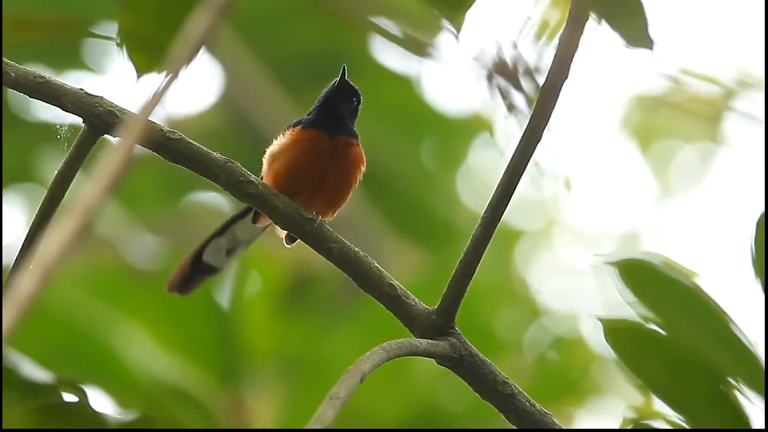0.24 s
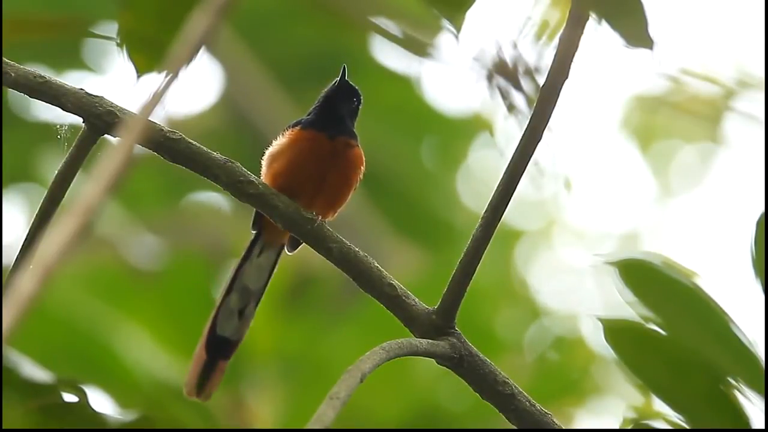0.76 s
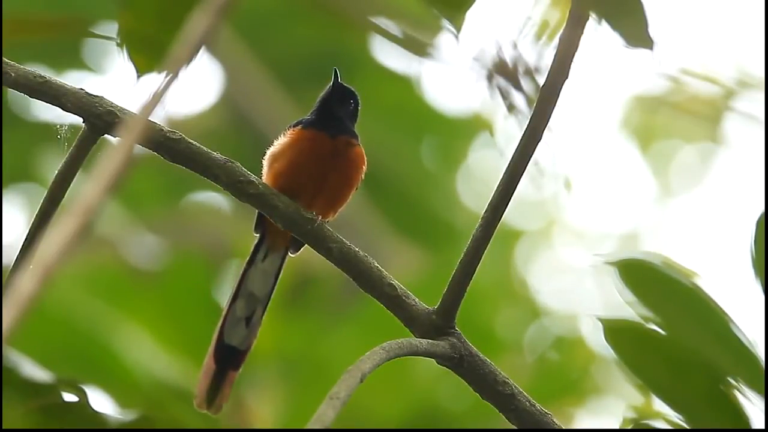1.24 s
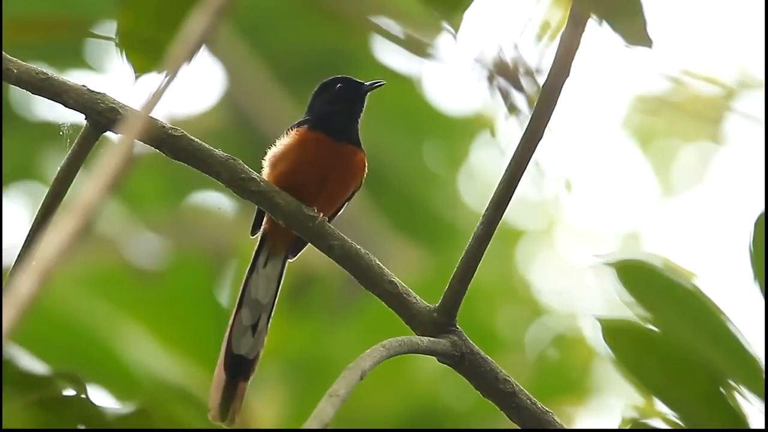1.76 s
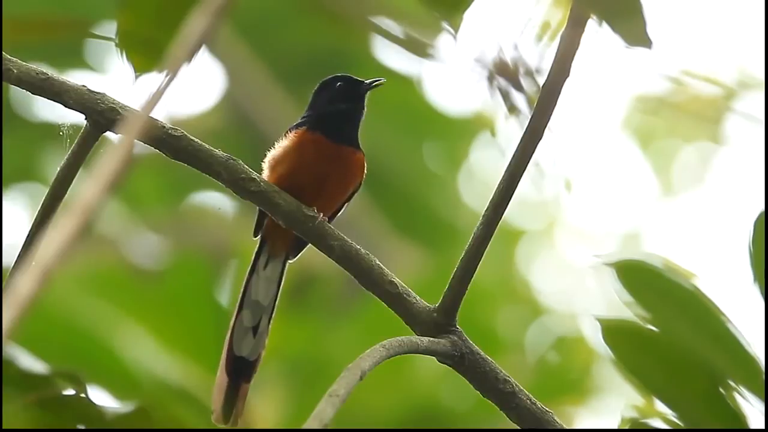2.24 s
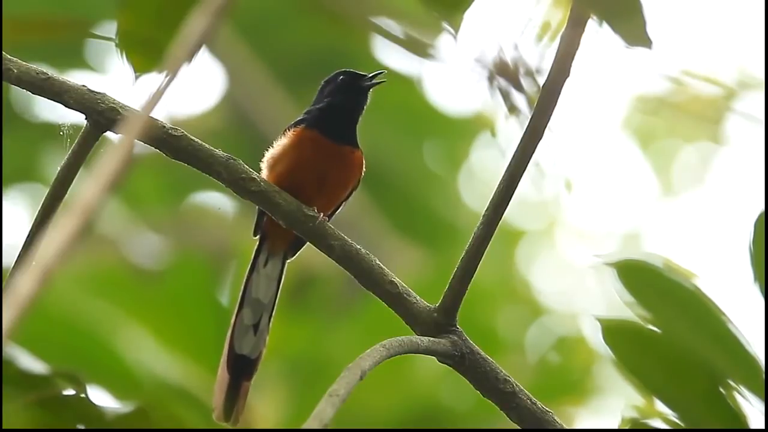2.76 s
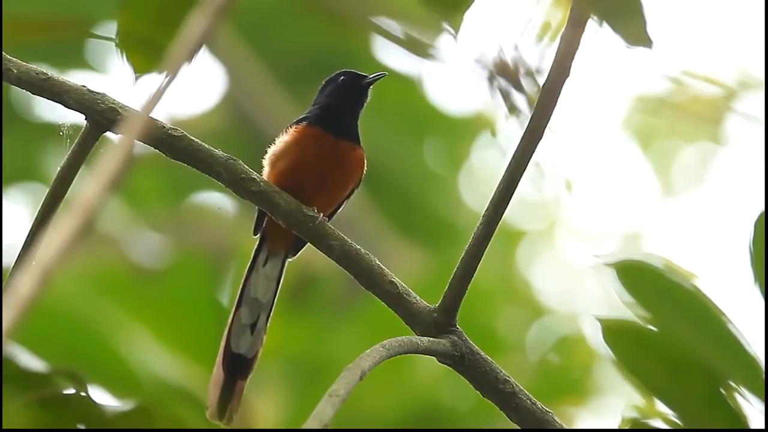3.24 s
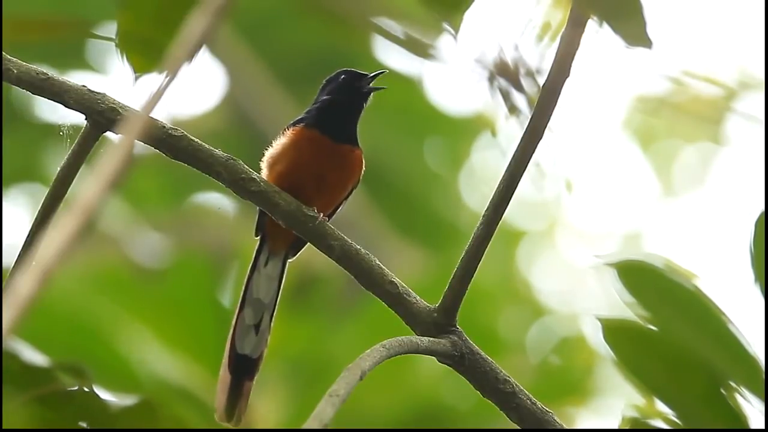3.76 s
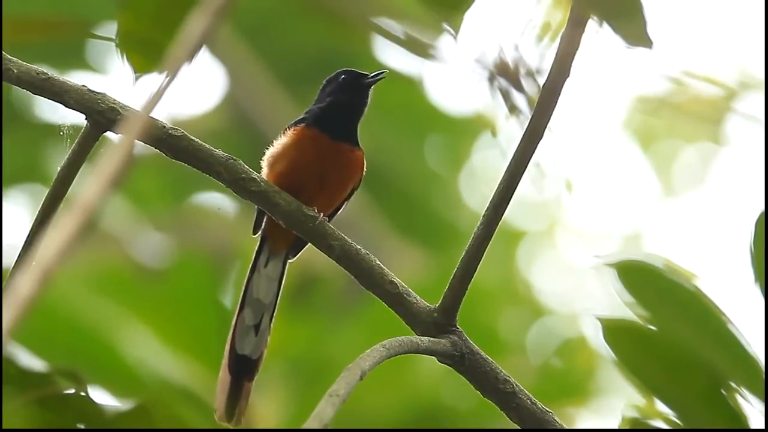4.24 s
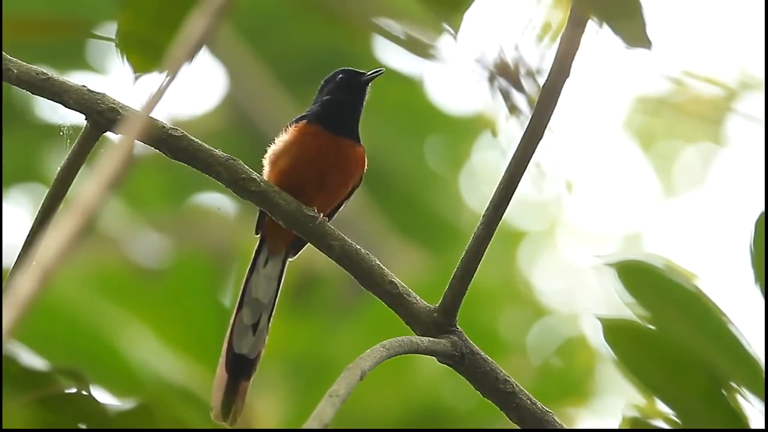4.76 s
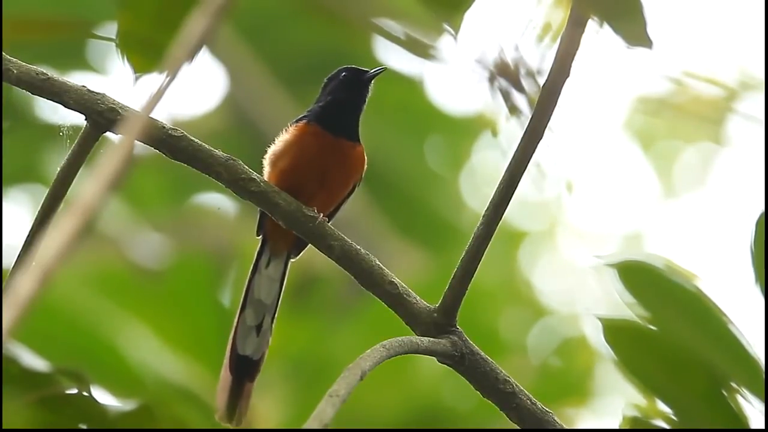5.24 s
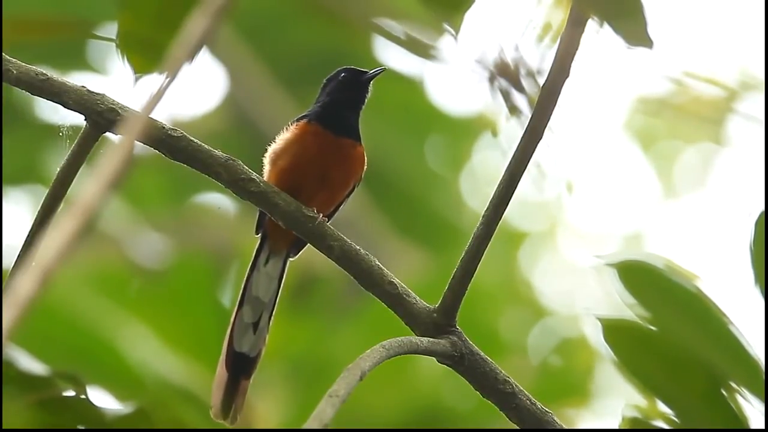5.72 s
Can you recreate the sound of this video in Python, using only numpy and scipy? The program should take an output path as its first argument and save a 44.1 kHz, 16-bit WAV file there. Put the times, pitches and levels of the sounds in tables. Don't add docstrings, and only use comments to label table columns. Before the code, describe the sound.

For the first second there is only soft rumble, a tight high chip and weak far notes. After a tiny dropout, a bird sings loudly: smooth upward whistles around two kilohertz, interleaved with rough, rapidly pulsed churrs climbing a little higher. Small flecks and grace notes decorate them. Close woodland echoes and a leafy tail blur the notes, over steady distant traffic, scraping insects and faint high hiss, in an outdoor pickup.

```python
import sys
import numpy as np
from scipy import signal
from scipy.io import wavfile
from scipy.ndimage import uniform_filter1d

SR = 44100
rng = np.random.default_rng(int(sys.argv[2]) if len(sys.argv) > 2 else 0)


def nominal_scale(level):
    x = np.asarray(level, float) / 20
    return 10 ** x


def dump(signal):
    limited = np.clip(np.atleast_2d(signal).T, -1, 1)
    pcm = np.round(limited * 32767).astype(np.int16)
    wavfile.write(sys.argv[1], SR, pcm)


N = 264159
GAP_START_S, GAP_END_S = 1.2915, 1.3165


def evened(x):
    return x / np.sqrt(np.mean(x ** 2) + 1e-20)


def read(points, hz):
    f, value = np.transpose(points)
    return np.interp(np.log(hz + 1), np.log(f + 1), value)


def curve(rows):
    s, value = np.transpose(rows)
    return np.interp(np.arange(N) / SR, s, value)


def wander(length, hz):
    size = max(int(SR / hz / 2), 2)
    smooth = uniform_filter1d(rng.standard_normal(length), size)
    return evened(uniform_filter1d(smooth, size))


def patchwork(x, size):
    return evened(uniform_filter1d(uniform_filter1d(x, size=size, axis=0), size=size, axis=1))


def hiss(points, patchy_db):
    frames, hz = N // 256 + 5, np.fft.rfftfreq(1024, 1 / SR)
    a, b, patches = rng.standard_normal((frames, 513, 3)).T
    level_db = read(points, hz)[:, None] + patchy_db * patchwork(patches, 12)
    z = (a + 1j * b) * nominal_scale(level_db)
    return evened(signal.istft(z, nperseg=1024, noverlap=768)[1][:N])


def waver(hz, share):
    phase = 2 * np.pi * np.cumsum(hz * (1 + share * wander(N, 7.32))) / SR
    return np.sqrt(2) * np.sin(phase) * nominal_scale(0.93 * wander(N, 27.0))


def bouts(table, t60_s, bed_db):
    attack_s = 0.015
    t = np.arange(0, N, 64) / SR
    power = nominal_scale(2 * bed_db)
    for start, length, db in table:
        attack = np.clip((t - start) / attack_s + .5, 0, 1)
        release_db = -120 * np.maximum(t - start - length, 0) / t60_s
        power = power + attack * nominal_scale(2 * db + release_db)
    return np.interp(np.arange(N) / SR, t, np.sqrt(power))


def loudness(x):
    return np.sqrt(abs(uniform_filter1d(x ** 2, size=900)))


# (frequency [Hz], density [dB])
FIRST_AIR = [(15, -46), (32, -2), (50, -3), (110, 4.5), (200, -2.5), (400, -2), (600, 0), (900, -4.5),
             (1900, -15), (4170, -23), (7000, -30.5), (11300, -32.5), (14000, -80)]


def first_air():
    return nominal_scale(-48) * hiss(FIRST_AIR, patchy_db=1.2)


# (frequency [Hz], waver [share], level [dB])
ENGINE = [(68.4, .03, -45), (146.8, 0.029, -57.5), (303.5, 0.0184, -61), (556.4, 0.01186, -59)]
# (time [s], level [dB])
ENGINE_SWELL = [(0.0, -46), (0.056, -44), (0.426, -48), (0.524, -43), (0.574, -47), (1.016, -44),
                (1.07, -47), (1.232, -47.5), (1.29, -43)]


def engine_hum():
    swell = nominal_scale(curve(ENGINE_SWELL) - np.mean(np.array(ENGINE_SWELL)[:, 1]))
    return swell * sum(nominal_scale(db) * waver(hz, share) for hz, share, db in ENGINE)


# (start [s], length [s], level [dB])
CHIP_RASP = [
    (.295, .01, -68),
    (.3, .09, -78),
    (.398, 0.069, -52.5),
]


def chip_rasp():
    spectrum = [(2000, -5), (4500, 1.5), (6000, 11), (8000, 0.5), (11000, -4)]
    return bouts(CHIP_RASP, .6, -81) * hiss(spectrum, patchy_db=-5.5)


# (frequency [Hz], density [dB])
TRAFFIC = [(15, -34), (25, -14), (81, 5.5), (237, -0.5), (323, 3.5), (462, 0.5), (525, 2.5), (1020, -1),
           (1250, -6.5), (2200, -11), (2770, -12), (6120, -18), (8100, -35.5), (10200, -13), (11300, -80),
           (14700, -56), (22000, -120)]


def traffic_wash():
    return nominal_scale(-48.5) * hiss(TRAFFIC, patchy_db=0.65)


# (time [s], level [dB])
DRONE = [(1.3, -64.5), (2.3, -58), (3.0, -57), (3.6, -67.5), (4.8, -62.5), (5.99, -69)]


def far_drone():
    return nominal_scale(curve(DRONE)) * waver(518.8, 0.00631)


# (start [s], length [s],
# level [dB])
RASPS = [(1.664, 0.087, -52.5), (1.904, 0.11, -57), (2.408, 0.045, -51.5), (2.801, 0.27, -53.5),
         (3.156, 0.15, -50), (3.492, 0.11, -50.5), (3.742, 0.28, -51), (4.124, 0.2, -50.5),
         (4.875, 0.046, -60), (5.517, 0.052, -52), (5.86, 0.12, -53)]
# (frequency [Hz], density [dB])
RASP_SPECTRUM = [(4000, -10.5), (5000, -3), (6000, 0), (7300, -6), (7480, -17)]
RELEASE_T60_S = 0.56


def high_rasps():
    flutter = nominal_scale(0.88 * wander(N, 60))
    return bouts(RASPS, RELEASE_T60_S, -63) * flutter * hiss(RASP_SPECTRUM, patchy_db=1.5)


# (start [s], length [s], level [dB])
INSECTS = [(1.421, 0.072, -52.5), (1.574, 0.051, -53), (1.906, 0.076, -57), (2.834, 0.072, -51),
           (3.199, 0.078, -53), (3.791, 0.26, -53.5), (4.28, 0.074, -53), (4.46, 0.083, -56),
           (4.62, 0.069, -55.5), (4.795, 0.053, -52), (4.961, 0.039, -51.5)]
# (start [s], length [s], level [dB])
INSECT_BEDS = [
    (1.3, .75, -59.5),
    (3.78, 1.33, -64),
    (5.87, .12, -59.5),
]


def insect_chorus():
    spectrum = [(6500, -13.5), (7000, 0.5), (7450, 0), (7620, 1), (7750, -51)]
    flutter = nominal_scale(1.4 * wander(N, 60))
    return bouts(INSECTS + INSECT_BEDS, .2, -67.5) * flutter * hiss(spectrum, patchy_db=-1.7)


# (start [s], length [s], level [dB])
FIZZ_BEDS = [
    (2.1, 1.7, -70),
    (4.12, 1.45, -52),
    (5.87, .12, -60),
]


def fizz(birds, spray):
    effort = bouts(FIZZ_BEDS, RELEASE_T60_S, -64.5)
    effort = effort + nominal_scale(-30) * loudness(birds) + nominal_scale(-10) * loudness(spray)
    return effort * hiss([(7400, -41), (7800, 14.5), (9000, 13), (10500, 10.5)], patchy_db=-3.5)


# (multiple [of pitch], level [dB])
OVERTONES = [(2, -36.5), (3, -56), (4, -59), (5, -32.5)]
# (frequency [Hz], lift [dB])
TREBLE = [(2500, 2), (5000, 0.5), (7000, -21), (9000, -20), (9350, 7.5), (10800, 6.5)]


def note(rows):
    s, *columns = np.transpose(rows)
    t = np.arange(s[0], s[-1], 1 / SR)
    hz, effort_db, buzz = (uniform_filter1d(np.interp(t, s, c), size=400, mode="nearest")
                           for c in columns)
    buzz = np.clip(buzz, 0, 1)
    jitter, pace, force, flutter, breath = (wander(SR // 4, rate_hz)[:len(t)]
                                            for rate_hz in (282, 58.6, 162, 900, 1300))
    turns = np.cumsum(105 * (1 + .3 * pace)) / SR + rng.random()
    within = turns % 1
    scoop, flick = .85 * np.exp(-within / .24), .8 * within ** 5
    step = .06 * rng.standard_normal(64)[turns.astype(int)]
    off = (0.0037 + 0.0321 * buzz) * jitter + buzz * (flick - scoop + step + .12)
    throat = 1 / np.sqrt(1 + (off / .095) ** 2)
    hz = hz * np.maximum(1 + off, .3)
    phase = 2 * np.pi * np.cumsum(hz) / SR
    voice = throat * np.sin(phase)
    for k, db in OVERTONES:
        overtone_db = db + read(TREBLE, k * hz) + 6.2 * buzz + 4.0 * flutter
        voice += nominal_scale(overtone_db) * np.sin(round(k) * phase)
    voice += nominal_scale(-12.0) * buzz * breath * np.cos(phase)
    depth = np.clip(1.76 * buzz, 0, .9)
    pulses = 1 - depth + 0.9 * depth * np.sin(np.pi * within) ** 1.23
    bursts = pulses * nominal_scale(9.17 * buzz * force)
    return np.sqrt(2) * nominal_scale(effort_db) * bursts * voice * signal.windows.tukey(len(t), .2)


def singer(notes):
    out = np.zeros(N)
    for rows in notes:
        sound, at = note(rows), round(max(rows[0][0], 0) * SR)
        out[at:at + len(sound)] += sound
    return out


def glide(start, length, from_hz, to_hz, bend):
    u = np.linspace(0, 1, num=33)
    return u, start + length * u, to_hz - (to_hz - from_hz) * (1 - u) ** bend


def strands(table, buzz):
    notes = []
    for start, length, from_hz, to_hz, peak_db in table:
        u, s, hz = glide(start, length, from_hz, to_hz, 2)
        effort_db = peak_db - 1.5 * (2 * u - 1) ** 2
        notes.append(np.transpose([s, hz, effort_db, buzz + 0 * u]))
    return notes


# (start [s], length [s], from [Hz], to [Hz], peak [dB])
DISTANT = [
    (.01, 0.081, 1837, 1920, -61.5),
    (.58, .08, 2800, 3560, -64.5),
    (.76, .14, 2800, 3570, -67),
    (1.0, .11, 2560, 3400, -64),
    (1.1, 0.11, 3680, 4250, -67),
    (5.69, .14, 1300, 1254, -59),
    (5.53, 0.19, 6100, 6120, -67.5),
]
# (start [s], length [s], from [Hz], to [Hz], peak [dB])
SHARP_CHIP = [
    (.395, 0.019, 2000, 4900, -62),
    (.415, 0.057, 6170, 6180, -51),
    (.4, 0.072, 3000, 5700, -68),
    (0.43, 0.076, 10000, 6000, -74),
    (.41, 0.082, 11000, 5600, -71),
    (.5, 0.041, 6210, 6240, -63),
]


def far_singers():
    return singer(strands(SHARP_CHIP, .053) + strands(DISTANT, .3))


# (start [s], length [s], from [Hz], to [Hz], peak [dB])
SPRAYS = [
    (1.61, 0.077, 1800, 2113, -40.5),
    (1.665, 0.069, 4100, 4530, -50),
    (2.4, .075, 3500, 4140, -43),
    (3.05, .06, 3200, 3620, -49),
    (3.76, 0.059, 3800, 4100, -74),
    (5.41, .15, 3090, 3590, -54.5),
    (4.59, 0.033, 3900, 4210, -50),
    (5.13, 0.02, 2570, 3170, -55),
]


def sprays():
    return singer(strands(SPRAYS, .56))


# (start [s], length [s], from [Hz], to [Hz], peak [dB])
GRACES = [
    (1.322, 0.033, 1840, 1986, -42.5),
    (2.05, 0.037, 1720, 2070, -42.5),
    (2.655, 0.059, 1946, 2017, -37),
    (3.328, 0.079, 1898, 2070, -35.5),
    (3.57, 0.054, 3000, 3050, -44),
    (3.672, 0.031, 1947, 2150, -35.5),
    (4.832, 0.037, 1856, 2112, -37),
    (4.855, 0.022, 2286, 2270, -37.5),
    (4.835, 0.097, 2600, 4180, -49),
    (4.865, .05, 5100, 6260, -53.5),
]
# (start [s], length [s], from [Hz], to [Hz], peak [dB])
CRESTS = [
    (1.452, 0.037, 2232, 2225, -24.5),
    (2.628, 0.034, 1330, 1480, -44.5),
    (2.785, 0.029, 2230, 2330, -27.5),
    (3.42, 0.034, 2160, 2324, -32),
    (3.59, 0.046, 2280, 2380, -27),
]
# (start [s], length [s], from [Hz], to [Hz], peak [dB])
SWEEPS = [
    (1.608, .045, 1963, 3046, -32),
    (1.635, .045, 2790, 4120, -40),
    (1.66, .05, 3300, 5530, -54),
]
# (start [s], length [s], from [Hz], to [Hz], peak [dB])
BURSTS = [
    (1.667, 0.0582, 2800, 3146, -33.5),
    (1.67, 0.0684, 3310, 3900, -42),
]


def accents():
    return strands(CRESTS, .08) + strands(SWEEPS, .53) + strands(BURSTS, .823) + strands(GRACES, .2)


CLOSE_POWER = 5.98
# (start [s], length [s], from [Hz], top [Hz], peak [dB])
CHURRS = [
    (2.283, .215, 1754, 2845, -22.5),
    (2.956, 0.14, 1970, 2712, -29),
    (3.671, .155, 2051, 2783, -24.5),
    (4.469, .19, 1495, 2699, -26.5),
    (5.375, .2, 2052, 2560, -29.5),
]


def churr(start, length, from_hz, top_hz, peak_db):
    u, s, _ = glide(start, length, from_hz, top_hz, 1)
    hz = top_hz - (top_hz - from_hz) * np.maximum(1 - u / .7, 0) ** 1.3
    to_go_khz = (top_hz - hz) / 1000
    effort_db = peak_db - 10.5 * to_go_khz - 11.5 * u ** CLOSE_POWER
    main = [s, hz, effort_db, .55 - .13 * u]
    under = [s, .8 * hz, effort_db - 14, .75 + 0 * u]
    core = [s, hz, effort_db - 5 - 40 * to_go_khz, .08 + 0 * u]
    return [np.transpose(voice) for voice in (main, under, core)]


# (start [s], length [s], top [Hz], peak [dB], bend [power])
SLIDES = [
    (1.314, .14, 2151, -27, 2),
    (2.055, 0.16, 2129, -23, 2.5),
    (2.641, 0.2, 2275, -22, 1.78),
    (3.317, .138, 2166, -17, 1.15),
    (4.835, 0.14, 2199, -23, 2.3),
]
# (start [s], length [s], top [Hz], peak [dB], bend [power])
SCOOPS = [
    (3.52, 0.14, 2376, -23, 2.2),
    (4.197, 0.14, 2256, -22.5, 1.55),
    (5.026, .135, 2180, -19.5, 2.2),
]
# (from [Hz], extra dip at the start [Hz], slope below the best pitch [dB per kHz])
SLIDE, SCOOP = (1300, 0, -51.5), (1550, 520, -29)


def whistle(start, length, top_hz, peak_db, bend, kind):
    from_hz, dip_hz, below_db = kind
    u, s, hz = glide(start, length, from_hz, top_hz, bend)
    hz = hz - dip_hz * np.exp(-(s - start) / .013)
    khz = (hz - 2070) / 1000
    beak_db = np.where(khz < 0, -khz * below_db, khz * -43)
    effort_db = peak_db + beak_db - 10 * u ** CLOSE_POWER
    buzz = .041 + (.22 - .041) * (1 - u) ** 4
    return np.transpose([s, hz, effort_db, buzz])


def songbird():
    notes = [whistle(*row, SLIDE) for row in SLIDES] + [whistle(*row, SCOOP) for row in SCOOPS]
    for row in CHURRS:
        notes += churr(*row)
    return singer(notes + accents())


ECHO_S = (.00685, .0112, .02078, .0485)
ECHO_DB = (-5, -4, -10, -14)


def trunks(x):
    out = x.copy()
    for s, db in zip(ECHO_S, ECHO_DB):
        late = round(s * SR)
        out[late:] += nominal_scale(db) * x[:-late]
    return out / np.sqrt(1 + np.sum(nominal_scale(np.array(ECHO_DB)) ** 2))


# (frequency [Hz], t60 [s])
WOOD = [(1000, 0.52), (2000, 0.77), (3000, 0.67), (6000, 1), (10000, 0.66)]


def forest(x):
    taps = np.zeros(SR)
    at = np.arange(300, SR - 20, 20)
    taps[at + rng.integers(0, 20, len(at))] = rng.choice([-1., 1.], len(at))
    hz, t, z = signal.stft(taps, SR, nperseg=256)
    tail = signal.istft(z * nominal_scale(-60 * t / read(WOOD, hz)[:, None]), SR, nperseg=256)[1]
    return signal.fftconvolve(x, tail / np.linalg.norm(tail))[:N]


def scene():
    spray = sprays()
    near, far = songbird() + spray, far_singers()
    t = np.arange(N) / SR
    scattered = forest(nominal_scale(-9.0) * near + nominal_scale(-1) * far * (t < GAP_START_S))
    birds = trunks(near + nominal_scale(6.0) * far) + scattered
    first = first_air() + engine_hum() + chip_rasp() + birds
    second = traffic_wash() + high_rasps() + insect_chorus() + fizz(birds, spray) + far_drone() + birds
    fade_out = np.clip((GAP_START_S - t) / .0012, nominal_scale(-32) * (t < GAP_END_S), 1)
    fade_in = np.clip((t - GAP_END_S) / .004, nominal_scale(-26) * (t > GAP_END_S - .007), 1)
    return (first * fade_out + second * fade_in)[None]


def starve(x):
    hz, t, z = signal.stft(x, SR, nperseg=512)
    in_whistle = (hz > 1500) & (hz < 2500)
    whistle_db = 10 * np.log10((abs(z[in_whistle]) ** 2).sum(0) + 1e-12)
    patches = patchwork(rng.standard_normal(z.shape), 4)
    short = np.exp(-((t - 1.515) / .105) ** 4)
    weak = np.exp(-((hz[:, None] - 8350 - 900 * short) / (850 + 750 * short)) ** 4)
    drop = np.clip((whistle_db + 24 * short + 31 + 7.5 * patches) / 4, 0, 1)
    return signal.istft(z * nominal_scale(-24 * weak * drop), SR, nperseg=512)[1][:N]


def roll_off(x):
    return signal.sosfilt(signal.butter(12, 11450, fs=SR, output="sos"), x)


def record(dry):
    edge = signal.firwin(511, 11120, window=("kaiser", 9), fs=SR)
    limited = signal.oaconvolve(starve(dry[0]), edge, "same")
    return roll_off(limited[None])


dry = scene()
out = record(dry)
dump(out)
```